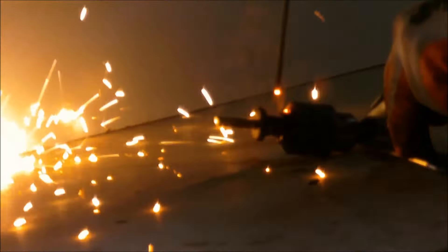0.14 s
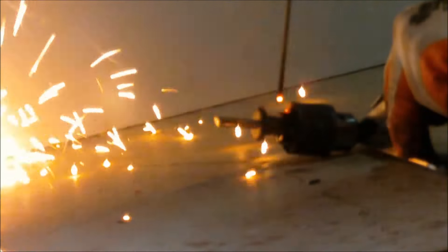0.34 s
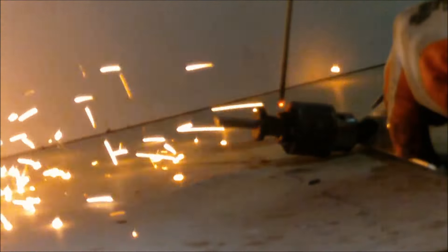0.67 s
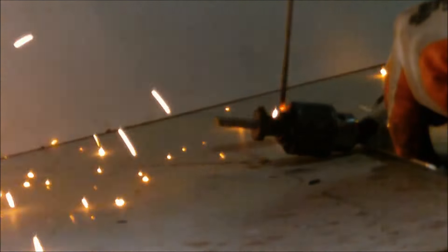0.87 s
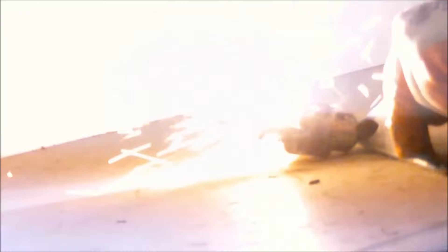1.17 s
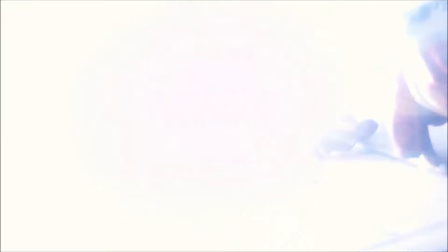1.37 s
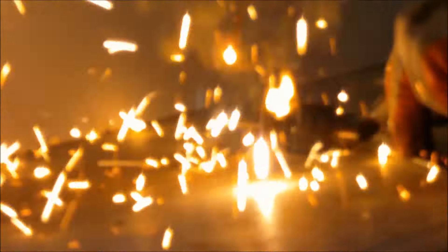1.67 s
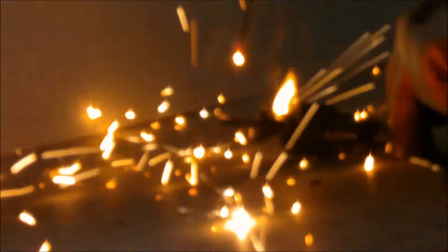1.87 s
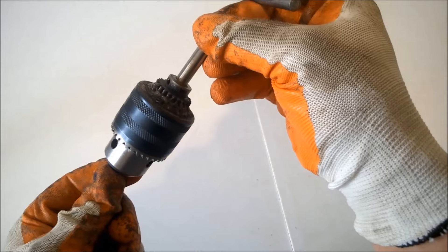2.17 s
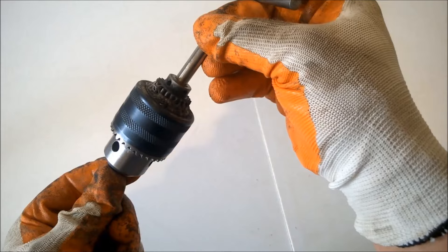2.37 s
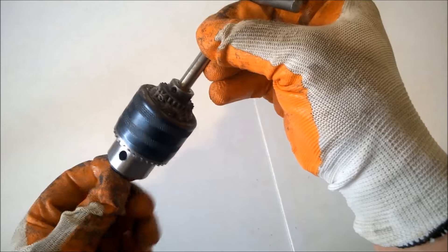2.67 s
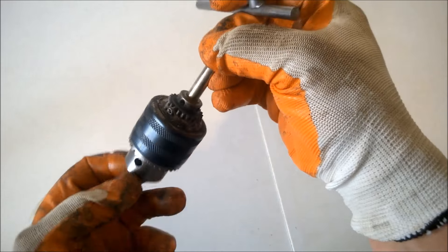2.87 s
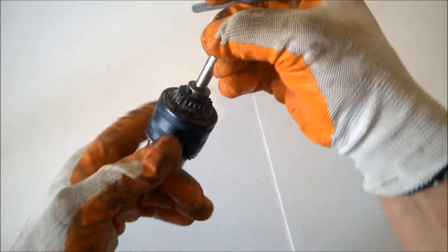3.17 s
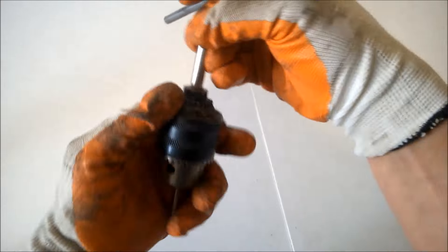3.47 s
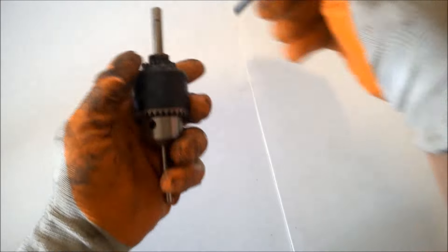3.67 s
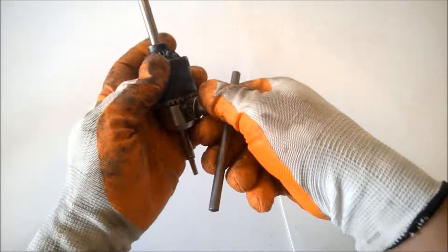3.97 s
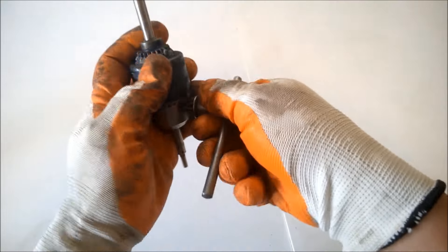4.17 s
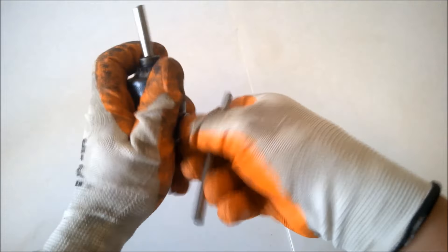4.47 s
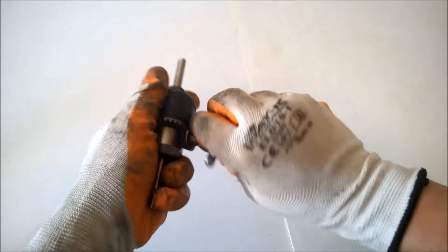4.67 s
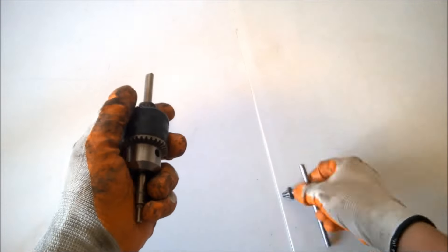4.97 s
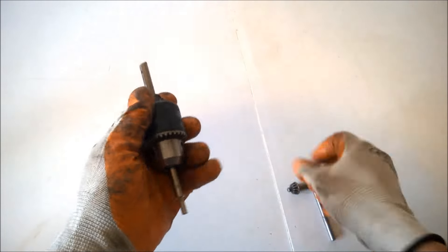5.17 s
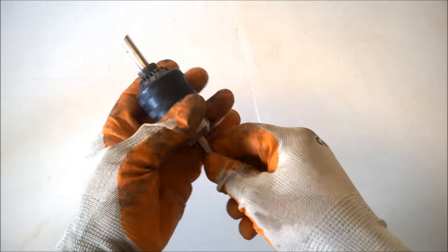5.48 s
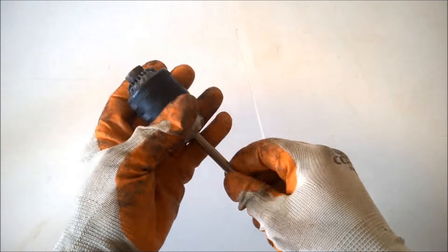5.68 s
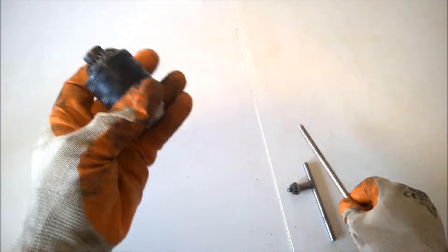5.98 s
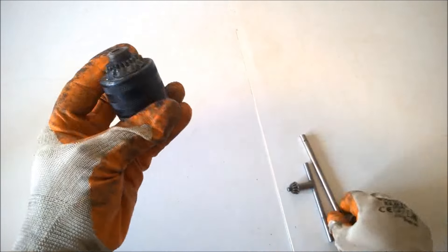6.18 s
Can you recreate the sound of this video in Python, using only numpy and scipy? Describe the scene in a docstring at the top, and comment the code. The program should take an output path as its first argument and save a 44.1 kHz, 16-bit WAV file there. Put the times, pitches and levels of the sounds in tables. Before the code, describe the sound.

Loud turbulent fan noise fills the first two seconds, slightly to the right, with a half-second burst of dense weld crackle and sharp spatter over a low rumble. After the abrupt stop, a close microphone catches quiet, dry handling: grainy rubber and knit gloves on steel, small bright ticks, a key knocking on hollow tile, two short rod scrapes and a final firm double knock.

```python
"""A welder's fan roars in a tiled room, then one short tack weld sizzles and spits on a drill chuck.
The roar is coloured noise with wavering motor tones; the weld is dense tiny impulses and short bursts.
The roar stops abruptly. Gloved hands turn the chuck in fine grains of noise, and steel clicks as short
ringing bursts. Key and rod knock on a hollow-sounding tile, which rings in fading tones, and a steel rod
scrapes out of the jaws in rough swells of tiny impulses."""
import sys
import numpy as np
from scipy import signal
from scipy.fft import rfft, irfft, next_fast_len
from scipy.io import wavfile
from scipy.ndimage import map_coordinates

SR = 44100
rng = np.random.default_rng(int(sys.argv[2]) if len(sys.argv) > 2 else 0)


def dump(signal):
    """Clip the signal to [-1, 1] and save it as 16-bit WAV at the path in sys.argv[1]."""
    limited = np.clip(np.atleast_2d(signal).T, -1, 1)
    pcm = np.round(limited * 32767).astype(np.int16)
    wavfile.write(sys.argv[1], SR, pcm)


N = 279594  # length of the scene in samples

FAN_STOP_S = 1.919
TOP_HZ = 15800


def amp(db):
    """Turn decibels into a gain."""
    return 10 ** (np.asarray(db) / 20)


def unit(x):
    """Scale a sound to an rms level of 1."""
    return x / np.sqrt(np.mean(x ** 2) + 1e-20)


def along(points, hz):
    """Read a curve of (pitch, value) points, spacing the pitches logarithmically."""
    point_hz, value = np.transpose(points)
    return np.interp(np.log(hz + 1), np.log(point_hz + 1), value)


def clock():
    """Give the time of every sample in seconds."""
    return np.arange(N) / SR


def wobble(rate):
    """Draw a smooth random curve through `rate` random points a second."""
    points = rng.standard_normal(int(N * rate / SR) + 4)
    return map_coordinates(points, [clock() * rate])


def filtered(x, gain):
    """Multiply each frequency of x by its own gain."""
    n = x.shape[-1]
    padded = next_fast_len(n + 8192)
    spectrum = rfft(x, padded) * gain(np.fft.rfftfreq(padded, 1 / SR))
    return irfft(spectrum, padded)[..., :n]


def coloured(x, spectrum):
    """Shape x with a spectrum, then set its rms level to 1."""
    return unit(filtered(x, lambda hz: amp(along(spectrum, hz))))


def resonant(x, peaks):
    """Lift x around resonances given as (pitch_hz, width_hz, lift_db)."""
    def gain(f):
        return amp(sum(db / (1 + (2 * (f - hz) / width) ** 2) for hz, width, db in peaks))
    return filtered(x, gain)


def noise(size=N):
    """Make white noise as a (mid, side) pair."""
    return rng.standard_normal((2, size))


def grains(rate, spread_db):
    """Scatter tiny impulses of uneven size at random times, on average `rate` a second."""
    present = rng.random(N) < rate / SR
    size = amp(spread_db * np.clip(rng.standard_normal(N), -2, 2))
    return unit(noise() * present * size)


def fading(t, t60):
    """Die away by 60 dB in t60 seconds."""
    return np.exp(-np.log(1000) * t / t60)


def held(start, end, attack_s, t60):
    """Rise from start, hold until end, then die away."""
    t = clock()
    return np.clip((t - start) / attack_s, 0, 1) * fading(np.maximum(t - end, 0), t60)


def tail(t60s):
    """Make dense ringing in which each frequency dies at its own speed."""
    hz, t, cells = signal.stft(noise(SR // 3), SR, nperseg=256)
    cells = cells * amp(-60 * t / along(t60s, hz)[:, None])
    return signal.istft(cells, SR, nperseg=256)[1][:, :SR // 3]


def add(track, s, sound):
    """Mix a sound into a track from time s."""
    part = track[..., round(s * SR):][..., :sound.shape[-1]]
    part += sound[..., :part.shape[-1]]


def reverberant(x, wet_db):
    """Add the tiled walls' echoes, a dense tail set off by the middle of the sound."""
    # how long the room rings: pitch_hz, t60_s
    wall_decay = [(200, 0.2), (2000, 0.25), (12000, 0.17)]
    walls = tail(wall_decay)
    echoes = signal.fftconvolve(x[:1], walls / np.linalg.norm(walls[0]), axes=1)[:, :N]
    return x + amp(wet_db) * echoes


def stereo(pair):
    """Make left and right from (mid, side), with the side level depending on pitch."""
    # width of the sound: pitch_hz, side_db
    side_level = [(100, -22.5), (1000, -18.5), (5000, -20.5), (9000, -20.5), (14000, -10)]
    mid, side = pair
    side = filtered(side, lambda hz: amp(along(side_level, hz)))
    return np.array([mid + side, mid - side])


def fan(air_db=-31.5, flutter_db=0.03, drift=0.0039, waver_db=4.5):
    """Turbulent air rings the welder's casing while motor tones waver in pitch and level."""
    # spectrum of the moving air: pitch_hz, level_db (per Hz)
    air_spectrum = [(20, -10.5), (60, -11.5), (150, -10.5), (290, -7), (420, -3), (560, -6.5), (800, -3.5),
                    (1130, -7), (1650, -4.5), (2700, -5.5), (3600, -10.5), (4300, -11.5), (6300, -20.5),
                    (9000, -23), (15500, -35)]
    # casing resonances: pitch_hz, width_hz, lift_db
    casing = [(306, 39, 8), (418.7, 51, 8.8), (697, 39, 6), (964, 75, 8.7), (1043, 12, 5.2),
              (1270, 110, 6.2), (1434, 27, 7.4), (1860, 120, 3.2), (2060, 60, 5.9), (2630, 250, 3.1),
              (3027, 250, 3.1)]
    # motor tones: pitch_hz, level_db (rms, before they waver)
    motor_tones = [(30, -59), (279.9, -51), (425.3, -52.5), (963.6, -53), (1055, -46), (1206, -54),
                   (2110, -51.5), (2495, -54.5)]
    air = coloured(resonant(noise(), casing), air_spectrum)
    sound = air * amp(air_db + flutter_db * wobble(44))
    # time that runs slightly fast and slow bends all the tones together
    uneven_time = np.cumsum(1 + drift * wobble(25)) / SR
    for hz, db in motor_tones:
        level = np.sqrt(2) * amp(db + waver_db * wobble(22))
        sound = sound + level * np.sin(2 * np.pi * hz * uneven_time)
    return sound


def arc(cooling_db=-49, gas_db=-46, puff_db=-30, flare_db=-26, sputter_db=1.5, surge_db=2.25):
    """Small discharges sizzle over rumbling gas, with a puff and dull flare at lighting and a cooling fizz."""
    # first touch, main burn and last spit as the electrode is drawn away:
    # start_s, end_s, level_db (of the sizzle), rise_s
    burns = [(1.062, 1.127, -36, 0.019), (1.096, 1.55, -28.5, 0.044), (1.551, 1.592, -31, 0.017)]
    # steel parts ringing under the arc: pitch_hz, width_hz, lift_db
    workpiece = [(1920, 260, 8.5), (2500, 75, 6.5), (3900, 62, 6), (4234, 110, 4), (5620, 93, 8),
                 (7700, 150, 3.5), (10210, 97, 3.5), (12540, 92, 4)]
    # spectrum of the sizzle: pitch_hz, level_db (per Hz)
    sizzle_spectrum = [(100, -16.5), (400, 0.5), (1000, -3.5), (2000, -2), (2800, 1), (3500, -0.5),
                       (5000, -1), (8000, -2.5), (12500, -1.5), (15000, -2.5), (16000, -17)]
    # these two spectra have the same columns
    flare_spectrum = [(100, -2), (2200, -0.5), (6000, -13.5), (15000, -28)]
    gas_spectrum = [(25, -13.0), (90, -0.5), (200, -5.5), (400, -20.5), (1500, -51.5)]
    lit, spent = burns[1][:2]

    spurts = [amp(db) * held(start, end, rise, t60=0.11) for start, end, db, rise in burns]
    burning = np.max(spurts, axis=0) * amp(surge_db * wobble(23))
    cooling = amp(cooling_db) * held(spent, spent, attack_s=.02, t60=1.4)

    discharges = reverberant(grains(rate=7000, spread_db=3), wet_db=-5)
    crackle = coloured(resonant(discharges, workpiece), sizzle_spectrum)
    flare = amp(flare_db) * held(lit, lit, attack_s=0.0059, t60=0.44)
    flare = flare * coloured(noise(), flare_spectrum)

    rumble = amp(gas_db) * held(lit, spent, attack_s=0.022, t60=0.89)
    puff = amp(puff_db) * held(lit, lit, attack_s=.005, t60=0.097)
    gas = coloured(noise(), gas_spectrum) * (rumble + puff)
    return (crackle * (burning + cooling) + flare) * amp(sputter_db * wobble(200)) + gas


def pops(crack_db=1, crack_s=.00016, spray_db=-17, spray_t60=0.019):
    """Each bursting molten drop sends out a short, hard shock and a brief spray."""
    # molten drops bursting: start_s, level_db
    bursts = [(1.1898, -8), (1.2386, -15), (1.282, -9), (1.3110, 2.5), (1.3134, -5.5), (1.479, 1.5),
              (1.4807, -15.5), (1.526, -7.5), (1.5892, -6)]
    # spectrum of shock and spray: pitch_hz, level_db (per Hz)
    shock_spectrum = [(100, -8), (400, -11.5), (700, -4), (1500, 3), (2500, 4.5), (5000, -3), (10000, 1),
                      (15500, -6)]
    out, t = np.zeros((2, N)), np.arange(SR // 20) / SR
    for s, db in bursts:
        shock = coloured(noise(len(t)), shock_spectrum) * np.exp(-(t / crack_s / 2) ** 2)
        shock *= amp(crack_db) / np.abs(shock[0]).max()
        spray = coloured(noise(len(t)), shock_spectrum) * fading(t, spray_t60)
        add(out, s, amp(db) * (shock + amp(spray_db) * spray))
    return reverberant(out, wet_db=-7.5)


def gloves(turning_db=-75.0, moving_db=-78, catch_db=2.3):
    """Rubber and knit catch on steel in fine grains; new grips ease off and quick slides swell and drop."""
    # gloves shifting their grip: start_s, length_s, palm_db (rubber), back_db (knit)
    regrips = [(2.917, 0.397, -63, -74.5), (3.445, 0.314, -62, -72), (3.769, 0.097, -77.5, -66.5),
               (4.277, 0.37, -71, -74), (4.463, 0.24, -67, -69.5), (4.664, 0.17, -65.5, -63.5),
               (4.869, 0.37, -71.5, -70), (5.258, .1, -71, -67)]
    # quick slides over the steel: peak_s, level_db, rise_s, fall_s
    slides = [(2.752, -62, 0.034, 0.019), (2.858, -50.5, 0.047, 0.031), (3.07, -62, .015, 0.016),
              (3.473, -56, 0.028, 0.016), (3.669, -52.5, 0.018, 0.013), (4.745, -62.5, 0.014, 0.011),
              (5.04, -63, 0.014, 0.013)]
    # spectra of rubber palm, knitted back and slide: pitch_hz, level_db (per Hz)
    palm_spectrum = [(150, -10.5), (500, -1), (1000, -0.5), (1700, -0.5), (2500, -0.5), (4000, -2.5),
                     (6000, -3), (8000, -11.5), (15000, -23)]
    knit_spectrum = [(1500, -17), (4000, 0), (7000, -2.5), (11000, 0), (15500, -8.5)]
    slide_spectrum = [(150, -9), (600, -9.5), (1100, -1), (1750, 3.5), (2500, -3), (3500, 0.5),
                      (6000, -2.5), (8500, -7.5), (12000, -4), (15500, -13.5)]
    regrip_attack_s, regrip_t60, sag_db_per_s = 0.037, .4, 17
    t = clock()
    # the palm turns the chuck, then the knit of the moving hands joins in
    palm = amp(turning_db) * held(1.98, 4.9, attack_s=0.0099, t60=2)
    knit = amp(moving_db) * held(3.75, 6.2, attack_s=.02, t60=0.46)
    for s, length, rubber_db, back_db in regrips:
        shift = held(s, s + length, regrip_attack_s, regrip_t60)
        shift = shift * amp(-sag_db_per_s * np.maximum(t - s, 0))
        palm = np.hypot(palm, amp(rubber_db) * shift)
        knit = np.hypot(knit, amp(back_db) * shift)
    rub = palm * coloured(grains(rate=6000, spread_db=3.5), palm_spectrum)
    rub += knit * coloured(grains(rate=18000, spread_db=2.5), knit_spectrum)

    sliding = np.zeros(N)
    for s, db, rise, fall in slides:
        sliding += amp(db) * np.exp(-((t - s) / np.where(t < s, rise, fall)) ** 2)
    slide = sliding * coloured(grains(rate=7900, spread_db=2.5), slide_spectrum)
    return rub * amp(catch_db * wobble(51)) + slide


def room(level_db=-67):
    """The quiet room is soft coloured noise whose level wanders, entering just after the fan stops."""
    # spectrum of the room: pitch_hz, level_db (per Hz)
    room_spectrum = [(12, -46), (20, -2.5), (59, -4), (92, -13.5), (140, -12.5), (289, -17.5), (393, -18.5),
                     (427, -21), (811, -25.5), (1980, -30.5), (15500, -38.5)]
    audible = clock() - FAN_STOP_S > .064
    return amp(level_db + wobble(5.4)) * coloured(noise(), room_spectrum) * audible


def clicks(tick_db=2.5, tick_t60=0.0086, ring_t60=0.044, rise_s=0.00037, focus=.32, spill=0.08):
    """Steel contacts and dull knocks of the chuck on the palm tick, rebound once and ring most in the
    resonances near a favoured pitch."""
    # steel touching steel, and the chuck knocking on the gloved palm (the dull low rows at 4.386 s and 4.571
    # s): start_s, level_db, pitch_hz (where it rings most), ring_db
    contacts = [(2.301, -61, 2205, -3.5), (3.300, -46, 4650, -10.5), (3.48, -47, 3900, -0.5),
                (3.668, -50.5, 2990, -11), (3.672, -48.5, 13960, -3), (4.051, -41.5, 11950, -10),
                (4.164, -49.5, 3880, -8), (4.1743, -40, 11700, -0.5), (4.2009, -40.5, 11740, -10.5),
                (4.290, -48.5, 3970, -21.5), (4.386, -51, 1390, 0.5), (4.440, -56, 3900, -2),
                (4.569, -38, 7260, -6.5), (4.571, -46.5, 895, -3), (4.702, -54.5, 3900, 2.5),
                (4.753, -43, 7090, -2), (4.792, -51, 7000, -8.5), (4.818, -39.5, 15000, -7),
                (5.407, -47, 3936, -6.5), (5.456, -42.5, 3900, -19.5), (5.546, -52.5, 3914, 3),
                (5.586, -44.5, 3930, -4), (5.634, -47.5, 3960, -8), (5.852, -35.5, 3985, -5),
                (5.863, -37.5, 9780, -1.5)]
    # chuck and key, damped by the gloves: pitch_hz, width_hz, lift_db
    steel = [(810, 270, 11.5), (1700, 190, 9), (2260, 200, 16), (3800, 430, 17), (5420, 350, 2),
             (7400, 710, 15), (10070, 400, -8), (11900, 470, 9), (12440, 490, 10), (15400, 700, 10.5)]
    # spectrum of the tick: pitch_hz, level_db (per Hz)
    tick_spectrum = [(300, -4), (1200, -14), (2200, 0), (3800, 0.5), (6000, -3.5), (9500, -9), (15500, -10)]
    rebound_s, rebound_db = .006, -11.5  # average delay and relative level
    out, t = np.zeros((2, N)), np.arange(SR // 6) / SR
    rise = 1 - np.exp(-t / rise_s)

    def tick():
        """Make a fresh burst of noise that dies quickly."""
        return amp(tick_db) * coloured(noise(len(t)), tick_spectrum) * fading(t, tick_t60)

    for s, db, centre_hz, ring_db in contacts:
        def favoured(f):
            """Favour pitches near the centre, letting a little of the rest through."""
            return spill + np.exp(-(np.log((f + 1) / centre_hz) / focus) ** 2)

        ring = unit(filtered(resonant(noise(len(t)), steel), favoured)) * fading(t, ring_t60)
        add(out, s, amp(db) * (tick() + amp(ring_db) * ring) * rise)
        rebound = s + rebound_s * (.5 + rng.random())
        add(out, rebound, amp(db + rebound_db) * tick() * rise)
    return reverberant(out, wet_db=-8.5)


def knocks(push_db=9, thump_hz=105, thump_t60=0.087):
    """Each landing pushes the tile and sets it ringing; soft contacts are slower and lose treble."""
    # key and rod landing on the tile: start_s, level_db, soft_hz (softer above this), modes_db, thump_db
    landings = [(5.0680, -43.5, 2000, -7, -20), (5.073, -31, 1450, 11, -8), (5.1958, -38, 1730, 5.5, -23),
                (5.2050, -46, 1490, 5, 11), (6.1185, -38, 1850, -12.5, -11.5), (6.212, -24, 4473, -7, -9),
                (6.2210, -30.5, 3500, -1.5, -18)]
    # spectrum of the dense ringing: pitch_hz, level_db (per Hz)
    tile_spectrum = [(30, -25), (90, -17), (200, -10), (340, 4), (500, -1.5), (690, 7), (1000, 2.5),
                     (1300, -5.5), (1800, 5), (2250, 4), (3200, -2), (5500, -8), (8500, -10), (12500, -1.5),
                     (15500, -8)]
    # the tile's main tones: pitch_hz, level_db, t60_s
    tile_modes = [(327, -20.5, 0.078), (666, -7, 0.043), (722, 0, 0.062), (881, -14, 0.037),
                  (1017, -6.5, .06)]
    # decay of the dense ringing: pitch_hz, t60_s
    tile_decay = [(100, 0.09), (260, 0.13), (700, .11), (1840, .115), (4850, 0.12), (12000, 0.11)]
    out, t = np.zeros((2, N)), np.arange(SR // 3) / SR
    modes = sum(amp(db) * fading(t, t60) * np.sin(-2 * np.pi * hz * t) for hz, db, t60 in tile_modes)
    thump = fading(t, thump_t60) * np.sin(2 * np.pi * thump_hz * t)
    for s, db, soft_hz, mode_db, thump_db in landings:
        def softened(f):
            """Give the tile its colour and take away treble."""
            return amp(along(tile_spectrum, f)) / (1 + (f / soft_hz) ** 2)

        u = np.pi * soft_hz * t  # time in units of the contact's duration
        dense = filtered(tail(tile_decay), softened) * (1 - np.exp(-u))
        dense /= np.std(dense[0, :SR // 50])  # the first 20 ms sets the level
        push = amp(push_db) * u * (u - 2) * np.exp(1 - u)
        add(out, s, amp(db) * (push + dense + amp(mode_db) * modes + amp(thump_db) * thump))
    return out


def rod(judder_db=6.0):
    """The rod sticks and slips in the jaws; each pull swells until it stops, the shorter one hissing more."""
    # pulls through the jaws: start_s, length_s, level_db (at the end), hiss_db (added)
    pulls = [(5.516, .115, -49.5, -9.5), (5.809, 0.062, -43.5, 6.5)]
    # spectra of the rasp and of the hiss: pitch_hz, level_db (per Hz)
    rasp_spectrum = [(300, -29), (1600, -31.5), (2600, -17), (3400, -7), (3850, 2.5), (4400, -4.5),
                     (5200, -10.5), (6400, -16), (7500, -13.5), (15500, -30.5)]
    hiss_spectrum = [(300, -23), (2200, -19.5), (4500, -4), (6500, -5.5), (8500, -1.5), (10200, 6.5),
                     (11500, -4.5), (13500, 0.5), (15500, 0)]
    attack_s, swell_db, pull_t60 = 0.013, 11.5, 0.059
    slips = grains(rate=3500, spread_db=5) * amp(judder_db * wobble(170))
    slips = reverberant(slips, wet_db=-8)
    rasp, hiss = coloured(slips, rasp_spectrum), coloured(slips, hiss_spectrum)
    out = np.zeros((2, N))
    for s, length, db, hiss_db in pulls:
        to_go = np.clip(1 - (clock() - s) / length, 0, 1)  # share of the pull still ahead
        level = amp(db - swell_db * to_go) * held(s, s + length, attack_s, pull_t60)
        out += level * (rasp + amp(hiss_db) * hiss)
    return out


def scene(stop_drop_db=-13, stop_t60=0.068):
    """Welding stops with a sudden drop and a short fade, then come quiet hands in the middle."""
    after = clock() - FAN_STOP_S
    running = np.where(after < 0, 1, amp(stop_drop_db) * fading(np.abs(after), stop_t60))
    lean = amp([[-.7], [.7]])  # the fan stands a little to the right
    welding = stereo(running * fan()) * lean + stereo(running * (arc() + pops()))
    handwork = gloves() + room() + clicks() + knocks() + rod()
    return welding + handwork[0]  # only the mid part, so the hands work dead centre


def record(dry):
    """Let nothing above the top frequency through."""
    return filtered(dry, lambda hz: hz < TOP_HZ)


dry = scene()
out = record(dry)
dump(out)
```